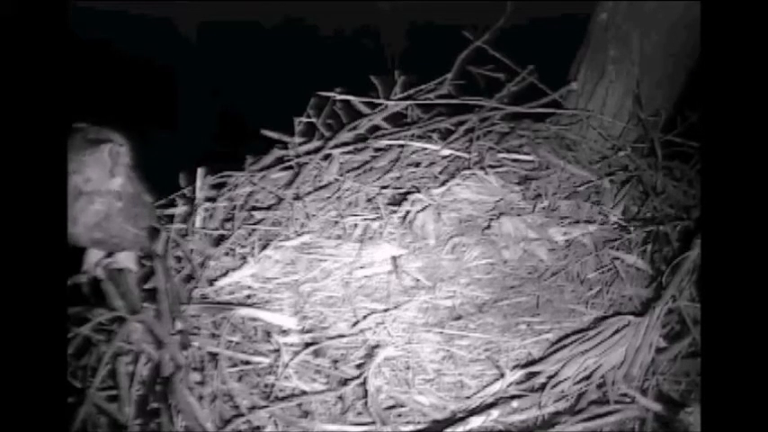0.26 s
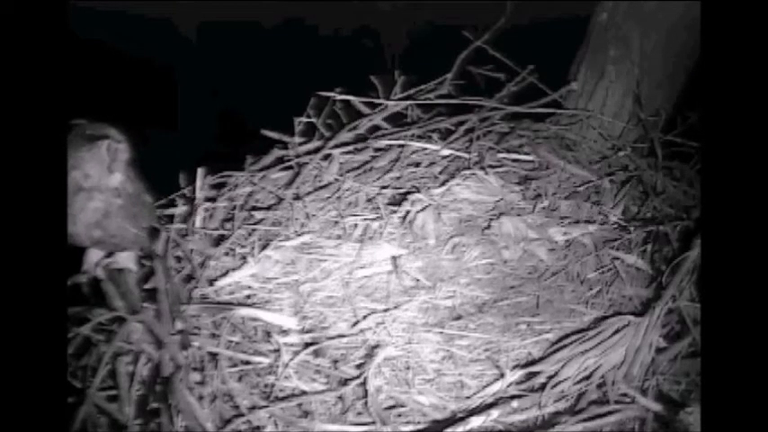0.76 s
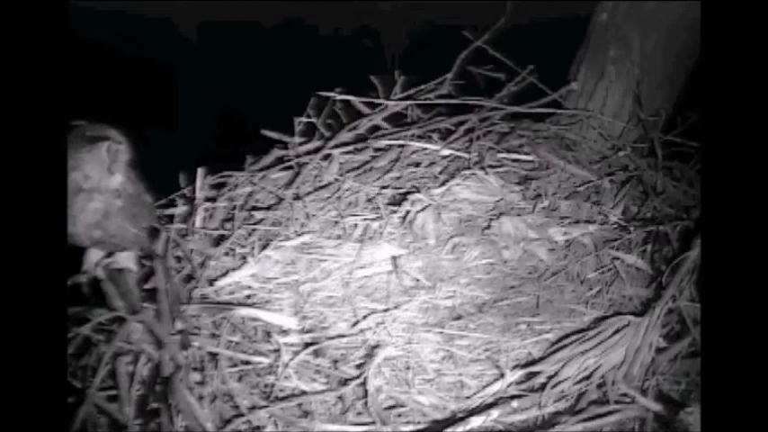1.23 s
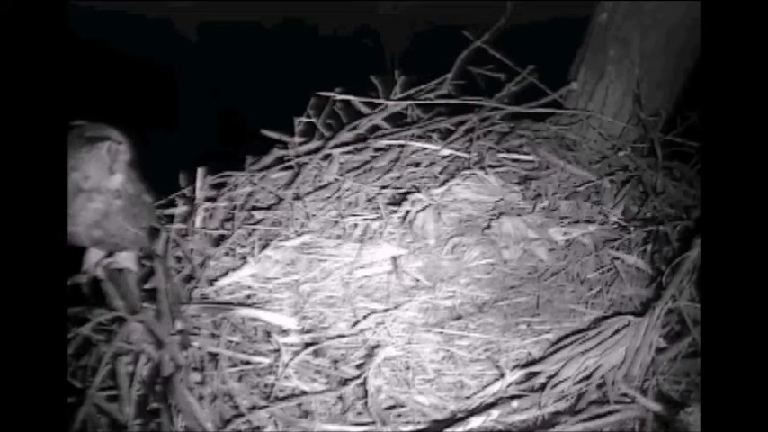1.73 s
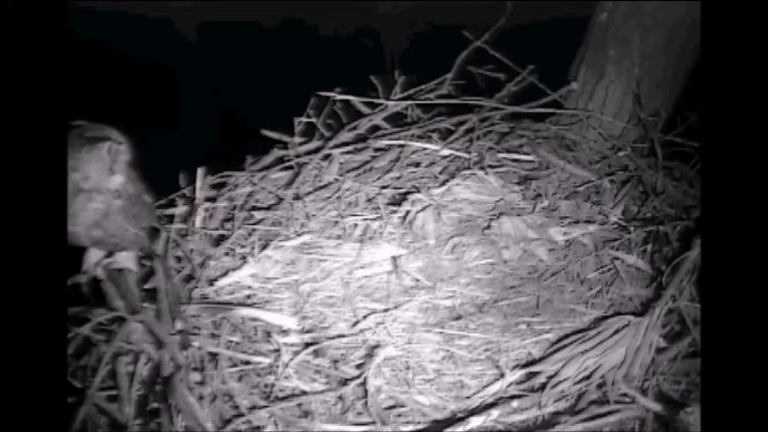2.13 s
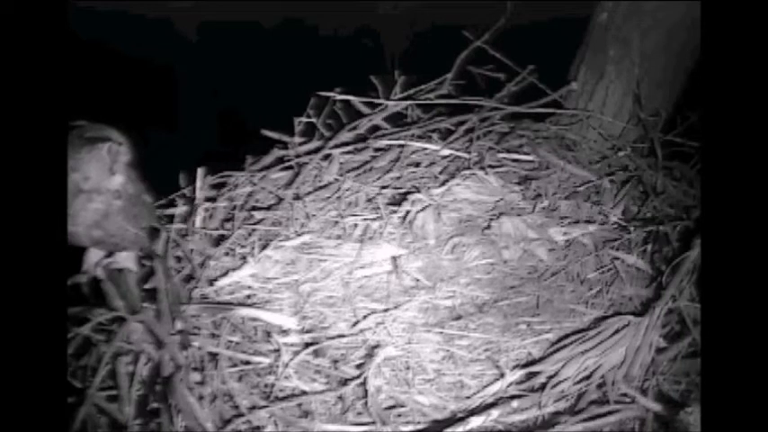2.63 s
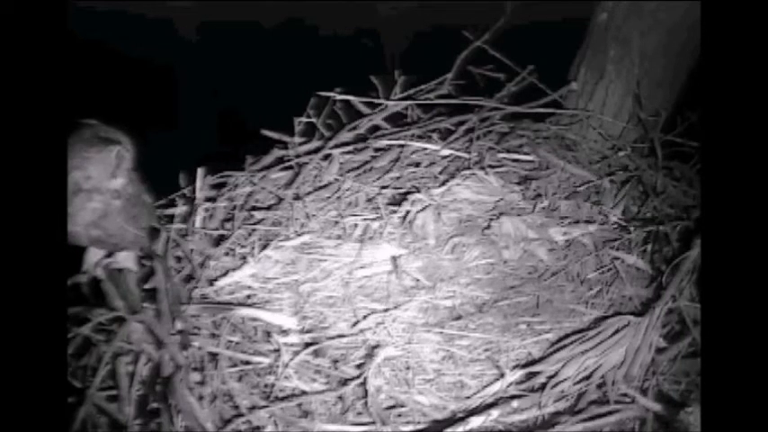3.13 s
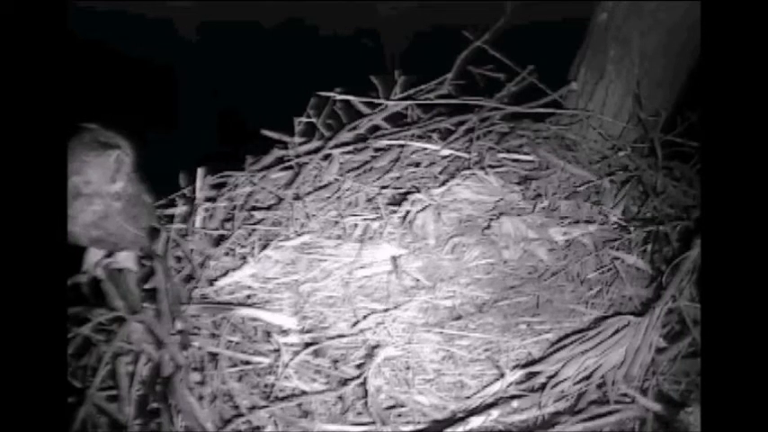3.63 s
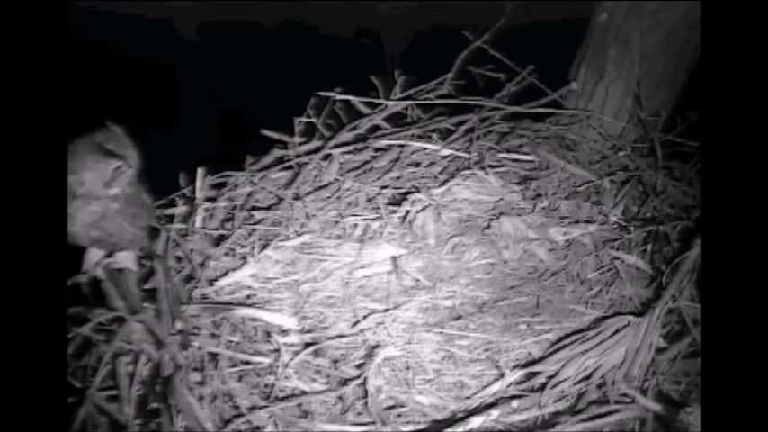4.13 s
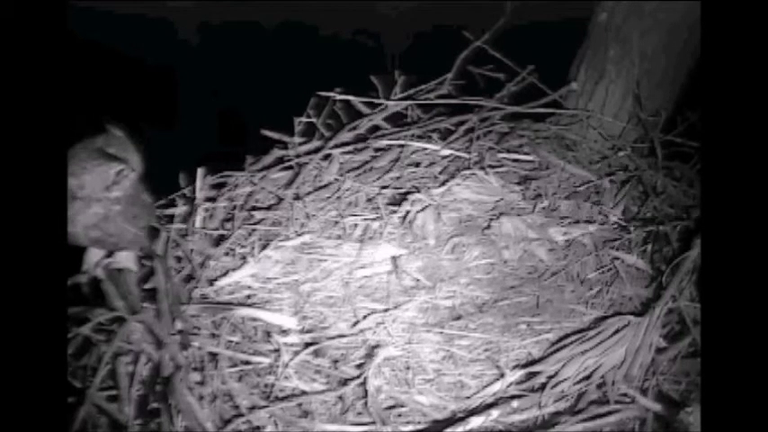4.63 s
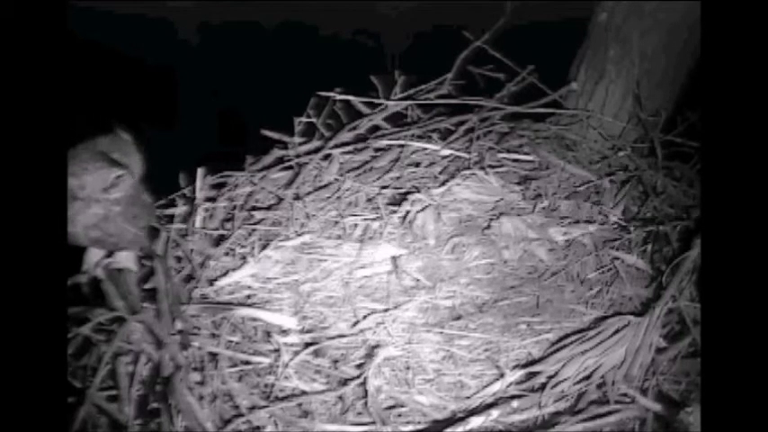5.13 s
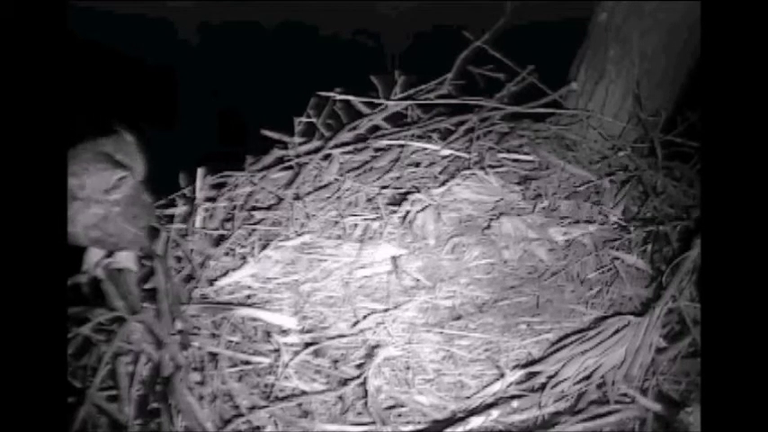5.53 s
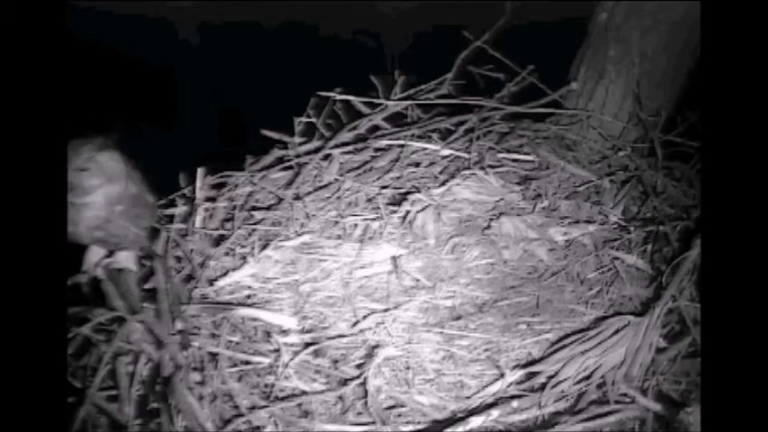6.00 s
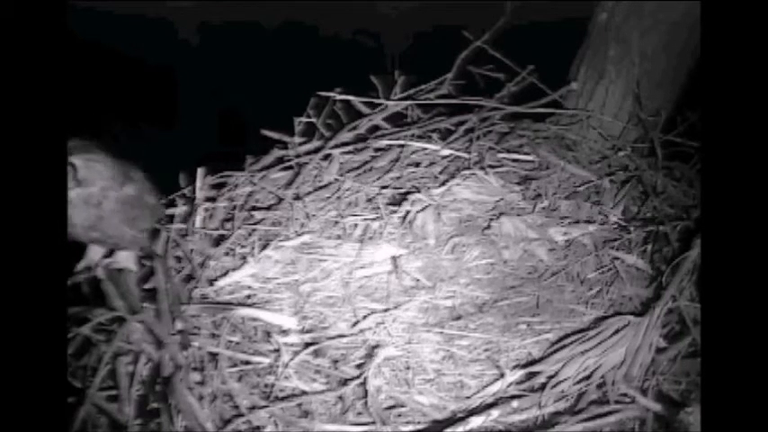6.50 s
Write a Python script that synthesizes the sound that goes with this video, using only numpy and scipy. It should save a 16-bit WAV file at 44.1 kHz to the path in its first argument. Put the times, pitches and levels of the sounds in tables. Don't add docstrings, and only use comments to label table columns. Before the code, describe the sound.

Low owl hoots at night, two short, then longer ones, a second owl rising over the fourth, above faint steady electrical hum and hiss.

```python
import sys
import numpy as np
from scipy import signal
from scipy.fft import rfft, irfft, next_fast_len
from scipy.io import wavfile
from scipy.ndimage import uniform_filter1d

SR = 44100
rng = np.random.default_rng(int(sys.argv[2]) if len(sys.argv) > 2 else 0)


def makeup_ratio(level_db):
    decades = np.asarray(level_db, float) / 20
    return 10 ** decades


def transcribe(signal):
    frames = np.atleast_2d(signal).T
    limited = np.clip(frames, -1, 1)
    pcm = np.round(limited * 32767).astype(np.int16)
    wavfile.write(sys.argv[1], SR, pcm)


N = 298084
FIELD_HZ, MAINS_HZ = 59.94, 60.026


def clock():
    return np.arange(N) / SR


def cycles(hz):
    return 2 * np.pi * hz * clock()


def evened(x):
    return x / np.sqrt(np.mean(x ** 2) + 1e-20)


def drift(samples):
    once = uniform_filter1d(rng.standard_normal(N), samples)
    return evened(uniform_filter1d(once, samples))


def coloured(x, points):
    hz, db = np.transpose(points)
    size = next_fast_len(N)
    grid = np.fft.rfftfreq(size, 1 / SR)
    gain = makeup_ratio(np.interp(np.log(grid + 1), np.log(hz + 1), db, -80, -80))
    return evened(irfft(rfft(x, size) * gain, size)[:N])


def coloured_noise(points):
    return coloured(rng.standard_normal(N), points)


def track(rows):
    s, hz, db = np.transpose(rows)[:3]
    t = clock()
    fade_s = .008
    angle = 2 * np.pi * np.cumsum(np.interp(t, s, hz) * (t >= s[0])) / SR
    fade_in = np.clip((t - s[0]) / fade_s, 0, 1)
    fade_out = np.clip(1 + (s[-1] - t) / fade_s, 0, 1)
    return np.sqrt(2) * makeup_ratio(np.interp(t, s, db)) * fade_in * fade_out, angle


# frequency in Hz, density in dB per Hz.
AIR_SPECTRUM = [(18, -69.5), (30, -25.5), (75, -24), (108, -17), (195, -8.5), (237, -5), (534, 2), (619, 1),
                (1040, -17.5), (1780, -21), (4320, -20.5), (7240, -30), (8610, -27.5), (9730, -28.5),
                (10700, -39.5), (14000, -50), (22000, -120)]


def air(level_db=-47.5, swell_db=0.73, flutter=0.055):
    noise = coloured_noise(AIR_SPECTRUM)
    touched = 1 + flutter * np.cos(2 * cycles(FIELD_HZ) - 1.3)
    return makeup_ratio(level_db + swell_db * drift(5000)) * noise * touched


# frequency in Hz, density in dB per Hz.
SIZZLE_SPECTRUM = [(2200, -21.5), (3500, 4), (5000, 2.5), (6500, -7), (7600, -4), (8450, 4), (8900, 0.5),
                   (9400, 1.5), (10200, -1.5), (10800, -18)]


def sizzle(level_db=-63, spread_db=3.5):
    gate = .5 + .5 * np.tanh(5 * (np.cos(2 * cycles(FIELD_HZ) - .94) - .1))
    spark_db = spread_db * np.minimum(rng.exponential(1, N), 5)
    sparks = rng.standard_normal(N) * makeup_ratio(spark_db)
    return makeup_ratio(level_db) * coloured(gate * sparks, SIZZLE_SPECTRUM)


# multiple of the base rate, picture buzz in dB, mains hum in dB.
HUM_PARTIALS = [(1, -71.5, -87), (2, -64, -75), (3, -57, -63), (4, -54.5, -68), (5, -55.5, -60),
                (6, -56, -72), (7, -57, -80), (8, -62, -75), (9, -64.5, -65), (10, -69, -71),
                (11, -73, -73)]
# frequency in Hz, level in dB.
WHINE_TONES = [(2099, -79), (3360, -82), (4199, -77), (7622, -86), (8014, -78), (10408, -89), (10864, -96)]


def hum():
    out = np.zeros(N)
    uneven = 1 + 0.17 * drift(500)
    for k, buzz_db, mains_db in HUM_PARTIALS:
        lead = .155 * k - .15 + .4 / k
        buzz = np.cos(k * cycles(FIELD_HZ) + 2 * np.pi * lead)
        out += makeup_ratio(buzz_db) * uneven ** (k > 3) * buzz
        mains_lead = .2 * k + .21 + (k in (4, 6)) / 2
        out += makeup_ratio(mains_db) * np.cos(k * cycles(MAINS_HZ) + 2 * np.pi * mains_lead)
    for hz, db in WHINE_TONES:
        unsteady = 1 + 0.18 * drift(9000)
        out += makeup_ratio(db) * unsteady * np.cos(cycles(hz) + .3 * drift(900))
    return np.sqrt(2) * out


# frequency in Hz, density in dB per Hz.
HISS_SPECTRUM = [(30, -7.5), (120, -7.5), (230, 1.5), (500, -5.5), (950, -10.5), (2000, -5), (4000, 0),
                 (6000, -5), (10000, -9), (10700, -11)]


def idle_hiss(level_db=-66.5):
    return makeup_ratio(level_db) * coloured_noise(HISS_SPECTRUM)


# pitch in Hz, tone level in dB, octave level in dB.
THROAT = [(205, -55, -41), (238.6, -34.5, -34.5), (272.6, -27, -30.8), (291.3, -23, -33),
          (306.6, -18.5, -35), (313.1, -10.5, -35)]


def octave_of(hz):
    at_hz, tone_db, octave_db = np.transpose(THROAT)
    return np.interp(hz, at_hz, octave_db - tone_db)


# time in seconds, pitch dip in Hz.
THROBS = [
    (1.758, 27.6),
    (1.823, 12.6),
    (3.783, 3.8),
]


def phrase(start, length, aim_hz, strength_db):
    rest_hz, throb_s, tire_db_per_s = 198, .0156, 10
    t = np.arange(0, length, .002)
    left_s = t - length
    rise = 142.32 * t - 296.32 * np.exp(-t / .0152)
    fall = 85.45 * np.exp(left_s / .165) + 350 * np.exp(left_s / .0156)
    slack = sum(dip_hz * np.exp(-((start + t - s) / throb_s) ** 2) for s, dip_hz in THROBS)
    hz = np.maximum(aim_hz + rise - fall - slack, rest_hz)
    at_hz, tone_db = np.transpose(THROAT)[:2]
    level_db = strength_db - tire_db_per_s * t + np.interp(hz, at_hz, tone_db)
    return np.c_[start + t, hz, level_db, octave_of(hz)]


# multiple of the pitch, level in dB.
UPPER_PARTIALS = [(3, -38), (4, -43), (5, -52.5)]
# frequency in Hz, density in dB per Hz.
BREATH_SPECTRUM = [(200, -37.5), (260, -24.5), (380, 18.5), (520, 7.5), (700, -32), (900, -31)]


def hoot(rows, breath_db=-22, ripple=0.37, ripple_twice=0.063, tremble=0.074):
    level, angle = track(rows)
    s, octave_db = np.transpose(rows)[[0, 3]]
    octave_gain = makeup_ratio(np.interp(clock(), s, octave_db))
    field = cycles(FIELD_HZ) + 0.86
    rippled = 1 + ripple * np.cos(field) + ripple_twice * np.cos(2 * field) + 0.14 * np.cos(3 * field)
    trembling = 1 + tremble * np.cos(field) + 0.047 * np.cos(2 * field)
    tone = np.cos(angle) * trembling
    octave = octave_gain * rippled * np.cos(2 * angle - 2.2 + 0.19 * drift(200))
    upper = sum(makeup_ratio(db) * rippled * np.cos(k * angle + .5 * drift(100)) for k, db in UPPER_PARTIALS)
    breath = makeup_ratio(breath_db) * np.sqrt(octave_gain) * coloured_noise(BREATH_SPECTRUM)
    return level * (tone + octave + upper + breath)


# start in seconds, length in seconds, aimed pitch in Hz, strength in dB.
HOOTS = [
    (1.195, .1414, 344.9, .6),
    (1.548, .1397, 347.8, 1.5),
    (1.669, .2756, 315.3, .9),
    (2.746, .3747, 313.16, -2.2),
    (3.536, .3256, 310.9, 0),
]


def owl():
    return sum(hoot(phrase(*row)) for row in HOOTS)


# delay in seconds, level in dB.
ECHOES = [
    (.05882, -30),
    (.13207, -23),
    (.15827, -26),
    (.25555, -35),
    (.31622, -35),
    (.35266, -39),
]


def woods(x):
    taps = np.zeros(SR // 2)
    taps[0] = 1
    for delay, db in ECHOES:
        taps[round(delay * SR)] += makeup_ratio(db)
    return signal.oaconvolve(x, taps)[:N]


# time in seconds, pitch in Hz, level in dB.
MATE_PATH = [
    (2.79, 228.94, -52),
    (2.815, 283.48, -25),
    (2.84, 282.97, -24.1),
    (2.87, 332.32, -19.6),
    (2.905, 346.23, -20.6),
    (2.945, 319.67, -18.7),
    (2.98, 356.7, -20.6),
    (3.008, 374.51, -26.4),
    (3.028, 305.53, -48.2),
]


def mate():
    return hoot(np.c_[MATE_PATH, octave_of(np.transpose(MATE_PATH)[1])])


# time in seconds, level in dB.
CRACK_TIMES = [
    (2.832, -63),
    (2.885, -56),
    (2.918, -49.5),
    (2.968, -60),
]
# frequency in Hz, density in dB per Hz.
CRACK_SPECTRUM = [(1200, -23), (2300, 7.5), (3600, 0.5), (4600, 4.5), (5600, -35)]


def cracks(width_s=0.0078):
    bursts = sum(makeup_ratio(db) * np.exp(-((clock() - s) / width_s) ** 2) for s, db in CRACK_TIMES)
    return 2 * bursts * coloured_noise(CRACK_SPECTRUM)


def glide(start, length, from_hz, to_hz, db, ends_db=-16):
    u = np.linspace(0, 1, num=9)
    hz = from_hz + (to_hz - from_hz) * u
    return np.c_[start + length * u, hz, db + ends_db * (2 * u - 1) ** 4]


# start in seconds, length in seconds, from Hz, to Hz, level in dB.
SQUEAKS = [
    (2.98, .045, 1750, 1960, -62),
    (2.985, .035, 2450, 2200, -64),
    (3.018, .045, 2090, 1850, -56),
    (3.11, .06, 3120, 3260, -69),
    (2.919, .026, 495, 480, -37),
]


def squeaks():
    out = np.zeros(N)
    for row in SQUEAKS:
        level, angle = track(glide(*row))
        out += level * (1 + .2 * drift(200)) * np.cos(angle + 0.46 * drift(200))
    return out


def recovery(x, duck_db=2.0, per_s=1.5, above_db=-22):
    power_db = 10 * np.log10(abs(uniform_filter1d(x ** 2, 800)) + 1e-12)
    rise = clock() * per_s
    sunk_db = np.clip((power_db - above_db) * 0.22, 0, duck_db)
    return makeup_ratio(rise - np.maximum.accumulate(sunk_db + rise))


def shuffle(at_s=6.58, level_db=-56.5, width_s=.13):
    rumble = coloured_noise([(120, -25), (170, -4), (250, 0), (300, -20)])
    return rumble * makeup_ratio(level_db) * np.exp(-((clock() - at_s) / width_s) ** 2)


def scene():
    owls = woods(owl() + mate() + squeaks())
    background = recovery(owls) * (air() + sizzle())
    left = 2 * (owls + shuffle() + hum() + background)
    return np.array([left, idle_hiss()])


# frequency in Hz, density in dB per Hz.
GRIT_SPECTRUM = [(40, -18), (90, -4), (180, -11), (400, -8.5), (1000, -3.5), (2300, -15), (4500, -32.5),
                 (7000, -32)]


def grit_and_overload(dry, grit_db=-32):
    envelope = np.sqrt(abs(uniform_filter1d(dry ** 2, 300, axis=1)))
    gritty = dry + makeup_ratio(grit_db) * envelope ** 1.12 * coloured_noise(GRIT_SPECTRUM)
    gritty[0] += cracks()
    knee, top = .82, .06
    over = np.maximum(abs(gritty) - knee, 0)
    return gritty - np.sign(gritty) * (over - top * np.tanh(over / top))


def band_limit(x):
    return signal.sosfilt(signal.butter(12, 10890, fs=SR, output="sos"), x)


def record(dry):
    low_pass = signal.firwin(511, 10880, window=("kaiser", 9), fs=SR)
    mix = signal.oaconvolve(grit_and_overload(dry), low_pass[None], "same")
    return band_limit(mix)


dry = scene()
out = record(dry)
transcribe(out)
```